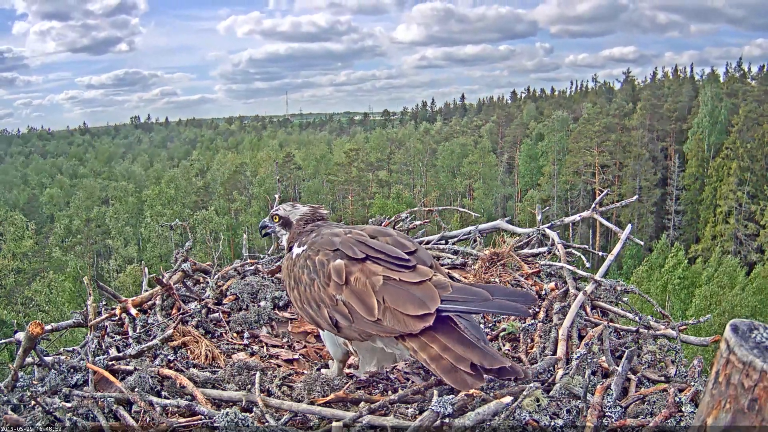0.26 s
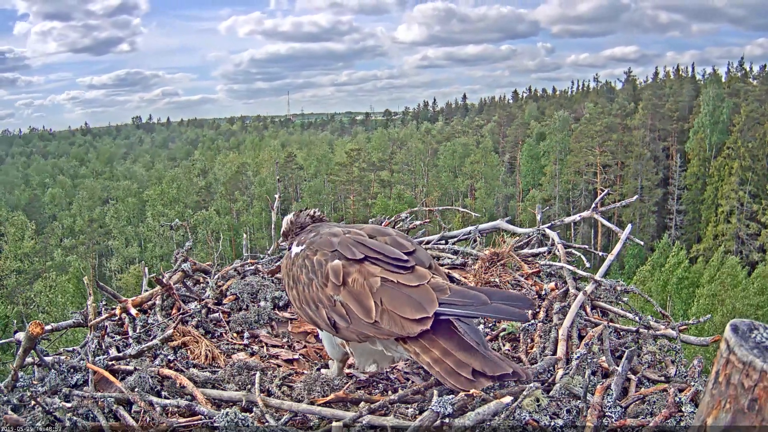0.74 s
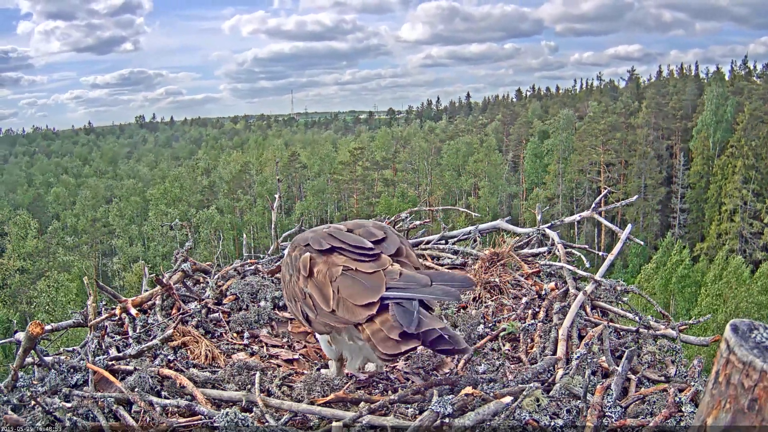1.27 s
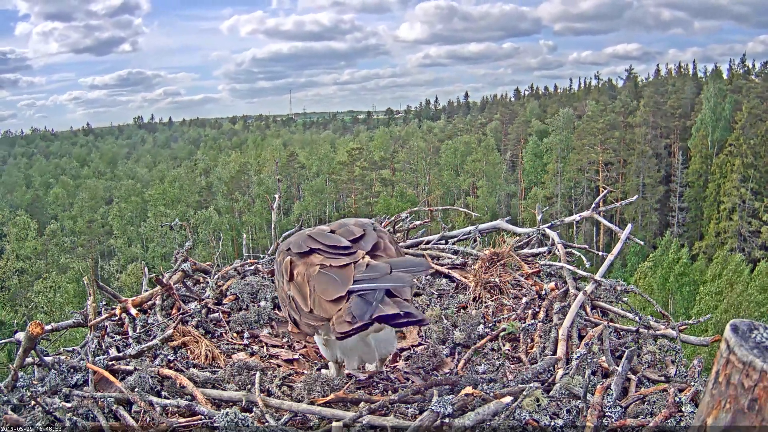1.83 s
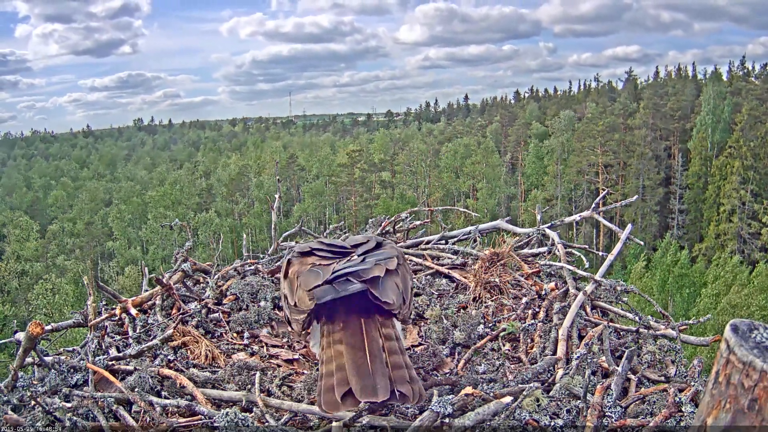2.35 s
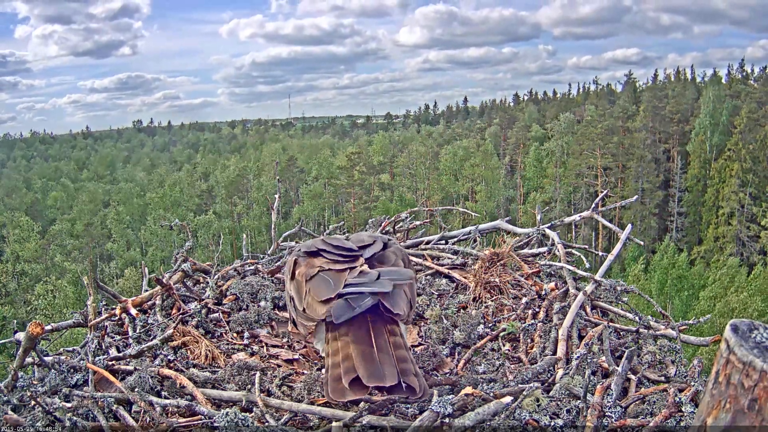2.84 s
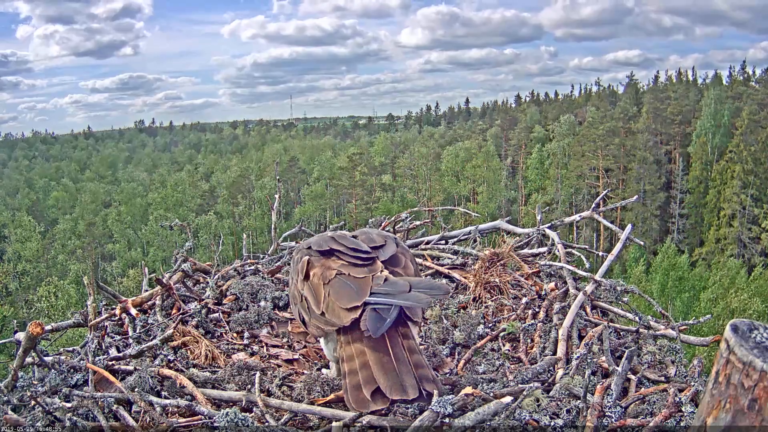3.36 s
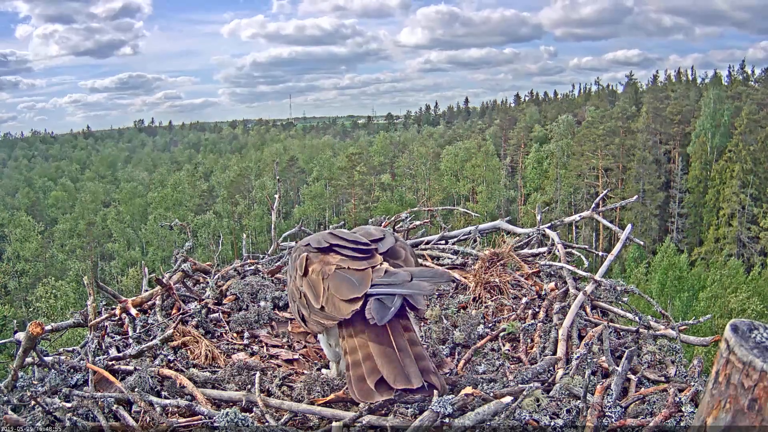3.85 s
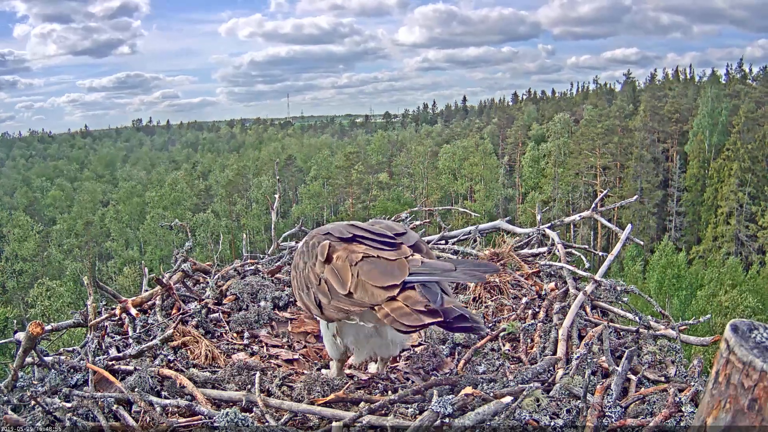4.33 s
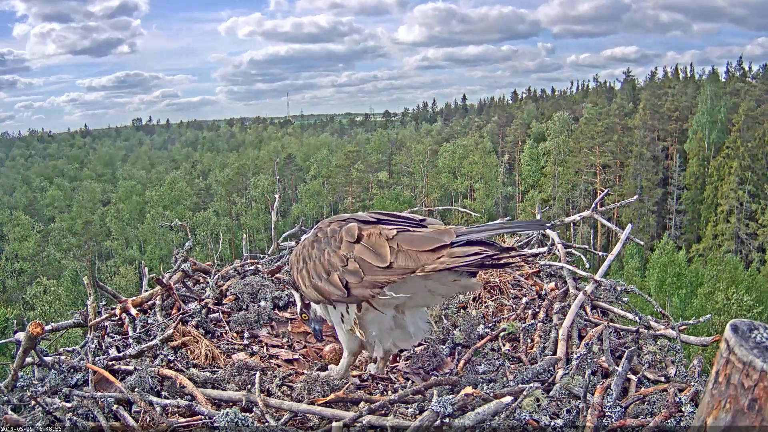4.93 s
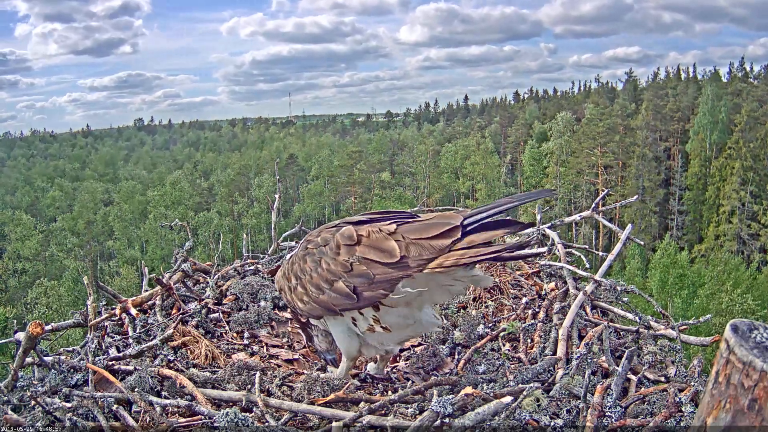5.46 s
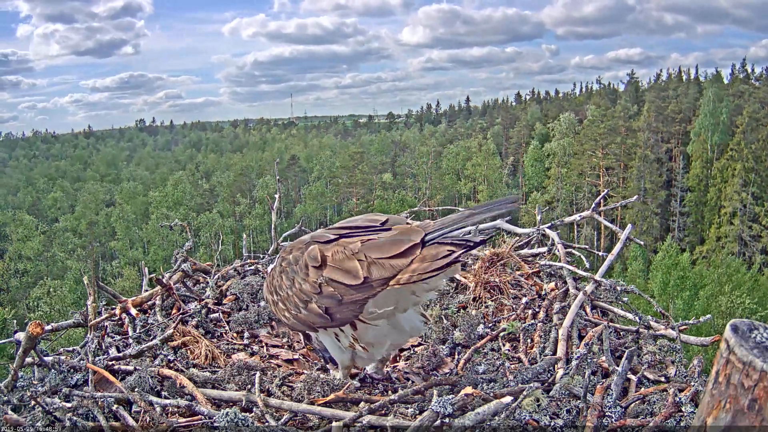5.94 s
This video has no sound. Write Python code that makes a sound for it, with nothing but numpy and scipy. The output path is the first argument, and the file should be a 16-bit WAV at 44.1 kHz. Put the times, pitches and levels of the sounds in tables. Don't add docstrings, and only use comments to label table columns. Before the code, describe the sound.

Outdoors at a large raptor nest above a forest, wind buffets a boxed microphone with deep soft thumps over rustling and faint hiss. Dry twigs tap now and then. A nearby chick gives four very brief falling whistles, the third loudest and the last hoarse. Far songbirds whistle thinly, and a fly drones past faintly twice.

```python
import sys
import numpy as np
from scipy import signal
from scipy.io import wavfile
from scipy.ndimage import uniform_filter1d

SR = 44100
rng = np.random.default_rng(int(sys.argv[2]) if len(sys.argv) > 2 else 0)


def waveform_to_disk(signal):
    frames = np.transpose(np.atleast_2d(signal))
    scaled = np.clip(frames, -1, 1) * 32767
    samples = np.round(scaled).astype(np.int16)
    wavfile.write(sys.argv[1], SR, samples)


def magnitude_from_level(level_db):
    exponent = np.asarray(level_db, float) / 20
    return 10 ** exponent


N = 272979

HOUSING_HZ, HOUSING_WIDTH_HZ = 5860, 300
THROAT_HZ, THROAT_WIDTH_HZ = 3820, 150
OCTAVE_DB, THIRD_DB = -29.5, -29
LOUD_DB = -22.5
SLIDE_HZ_PER_S, EFFORT_HZ_PER_S = 3530, 2100


def evened(x):
    return x / np.sqrt(np.mean(x ** 2) + 1e-20)


def wander(count, size):
    return evened(uniform_filter1d(uniform_filter1d(rng.standard_normal(count), size), size))


def add(mix, s, sound):
    part = mix[round(s * SR):][:len(sound)]
    part += sound[:len(part)]


def sequence(events, voice):
    layer = np.zeros(N)
    for s, *shape in events:
        add(layer, s, voice(*shape))
    return layer


def resonance(hz, centre_hz, width_hz):
    return 1 / (1 + ((hz - centre_hz) / width_hz) ** 2) ** 2


def chirp(length, first_hz, db, hoarse):
    last_hz = first_hz - length * (SLIDE_HZ_PER_S + EFFORT_HZ_PER_S * magnitude_from_level(db - LOUD_DB) ** 2)
    rise = 0.0025 + 0.09 * hoarse ** 2
    gap_hz = 435 - 300 * hoarse
    flutter_hz = 300 - 430 * hoarse
    depth = 0.03 + 1.0 * hoarse
    t = np.arange(0, length, 1 / SR)
    u = t / length
    drift, shake = wander(4000, size=60)[:len(t)], wander(4000, size=50)[:len(t)]

    hz = first_hz + (last_hz - first_hz) * u ** 1.27 + 70 * np.exp(-t / 0.0031)
    throb = 2 * np.pi * np.cumsum(flutter_hz * (1 + 0.06 * drift)) / SR - 0.9
    throb = np.sin(throb) + 0.45 * np.sin(2 * throb)
    shaken_hz = hz * (1 + 0.02 * depth * drift + 0.3 * depth * hoarse * throb)
    turn = 2 * np.pi * np.cumsum(shaken_hz) / SR
    beat_hz = gap_hz * (1 + 5 * hoarse * (u - 0.3) + 0.2 * depth * shake)
    beat = 2 * np.pi * np.cumsum(beat_hz) / SR

    effort = np.clip(t / rise, 0, 1) ** 1.5 * np.clip((length - t) / 0.003, 0, 1)
    effort = effort * magnitude_from_level(-5 * (1 - u) ** 4 - 10 * u ** 6)
    flutter = 1 + depth * (throb + 0.15 * shake)
    whistle = effort * flutter * np.sin(turn)

    octave = magnitude_from_level(OCTAVE_DB - 0.6 * (db - LOUD_DB) - 100 * hoarse) * effort
    octave = octave * resonance(2 * hz, THROAT_HZ, THROAT_WIDTH_HZ) * (1 + 0.3 * shake) * np.sin(2 * turn)
    third = magnitude_from_level(THIRD_DB + 0.5 * (db - LOUD_DB)) * effort
    third = third * resonance(3 * hz, HOUSING_HZ, HOUSING_WIDTH_HZ) * np.sin(3 * turn)
    second = hoarse * magnitude_from_level(-3.2 * u) * effort * (1 + 0.25 * drift) * np.sin(turn + beat)
    ring = magnitude_from_level(2 * db + 14 - 130 * (u - 0.8) ** 2) * effort * np.sin(2 * np.pi * 1.012 * HOUSING_HZ * t)
    return np.sqrt(2) * magnitude_from_level(db) * (whistle + octave + third + second + ring)


# start in seconds, length in seconds, first pitch in Hz, level in dB,
# hoarseness from 0 to 1.
CHIRPS = [
    (1.707, .053, 1950, -29.5, .02),
    (3.898, .031, 1974, -36, 0.11),
    (5.459, 0.051, 2025, -22.5, 0.04),
    (6.157, 0.064, 2160, -29, .355),
]


def chick():
    return sequence(CHIRPS, chirp)


def knock(hz, db, t60, scrape):
    t = np.arange(0, 0.15, 1 / SR)
    blur = 1 - scrape + scrape * wander(7000, size=30)[:len(t)]
    return magnitude_from_level(db - 60 * t / t60) * np.clip(t / 0.004, 0, 1) * blur * np.sin(2 * np.pi * hz * t)


# start in seconds, pitch in Hz, level in dB,
# 60 dB decay time in seconds, scrape share from 0 to 1.
TWIGS = [
    (.057, 1200, -36.5, .12, 0),
    (1.553, 660, -35, .13, .3),
    (2.165, 700, -41, .08, .5),
    (2.744, 980, -41, .08, .6),
    (4.36, 1040, -45, .06, .6),
    (6.116, 1450, -42, .05, 0.3),
    (6.134, 1390, -36, .04, .2),
    (6.14, 950, -38, .07, .35),
]


def twigs():
    return sequence(TWIGS, knock)


def drone(length, first_hz, last_hz, db):
    t = np.arange(0, length, 1 / SR)
    waver = wander(30000, size=1500)[:len(t)]
    wing_hz = np.linspace(first_hz, last_hz, len(t)) * (1 + 0.014 * waver)
    turn = 2 * np.pi * np.cumsum(wing_hz) / SR
    wings = np.sin(turn) + magnitude_from_level(-9.5) * np.sin(2 * turn)
    return np.sqrt(2) * magnitude_from_level(db) * wings * signal.windows.tukey(len(t), 0.3)


# start in seconds, length in seconds, first pitch in Hz,
# last pitch in Hz, level in dB.
FLY = [
    (1.601, 0.29, 203, 207.3, -56),
    (2.69, .43, 199.5, 194.6, -57),
]


def fly():
    return sequence(FLY, drone)


def note(rows, rasp):
    s, hz, db = np.transpose(rows)
    t = np.arange(s[0], s[-1], 1 / SR)
    smooth, grain = wander(20000, size=150)[:len(t)], wander(20000, size=45)[:len(t)]
    shimmer = evened(1 - rasp + 0.044 * smooth + rasp * grain)
    turn = 2 * np.pi * np.cumsum(np.interp(t, s, hz)) / SR
    edges = signal.windows.tukey(len(t), min(0.4, 0.017 / (s[-1] - s[0])))
    return np.sqrt(2) * magnitude_from_level(np.interp(t, s, db)) * shimmer * np.sin(turn) * edges


def forest(x, t60, wet_db):
    t = np.arange(SR // 2) / SR
    tail = rng.standard_normal(len(t)) * magnitude_from_level(-60 * t / t60) * np.clip(t / 0.039, 0, 1)
    return x + magnitude_from_level(wet_db) * signal.oaconvolve(x, tail / np.linalg.norm(tail))[:N]


# time in seconds, pitch in Hz, level in dB.
WARBLE = [(.775, 2450, -64), (.81, 2770, -56), (.88, 2900, -56), (.915, 3330, -57), (.985, 3500, -57),
          (1.04, 3250, -56), (1.07, 2980, -58), (1.16, 2900, -61)]
RISER = [(1.689, 2720, -60), (1.755, 2990, -61), (1.8, 3600, -56)]
# start in seconds, length in seconds, first pitch
# in Hz, # last pitch in Hz, level in dB.
FLUTE = [(1.05, 0.092, 2670, 2530, -64), (1.215, .08, 1880, 2100, -56), (2.63, .02, 2910, 2870, -60),
         (3.927, .011, 1900, 1830, -50), (4.015, 0.039, 2240, 2760, -57), (4.083, .015, 2940, 2870, -58),
         (4.075, 0.038, 2630, 2230, -51.5), (4.11, 0.03, 2130, 1940, -49.5), (4.17, 0.063, 3740, 3530, -66),
         (6.15, .013, 2590, 2250, -52)]
PIPS = [(1.363, .014, 5250, 5420, -62), (1.373, .04, 5480, 5530, -62), (1.42, .04, 5500, 5480, -67),
        (1.37, .04, 4330, 4330, -64), (1.49, .028, 4000, 4500, -62), (1.513, .022, 4480, 4550, -66),
        (2.03, .09, 5460, 5100, -69), (3.84, 0.033, 5550, 5420, -64), (5.6, 0.025, 6240, 6400, -66)]


def songbirds():
    def glide(rasp):
        return lambda length, first_hz, last_hz, db: note([(0, first_hz, db), (length, last_hz, db)], rasp)

    song = sequence(FLUTE, glide(rasp=0.12)) + sequence(PIPS, glide(rasp=0.25))
    add(song, WARBLE[0][0], note(WARBLE, rasp=0.56))
    add(song, RISER[0][0], note(RISER, rasp=0.2))
    return forest(song, t60=0.3, wet_db=-7)


def air(colour, patchy_db, size):
    hz = np.fft.rfftfreq(size, 1 / SR)
    a, b, patches = rng.standard_normal((N * 4 // size + 5, len(hz), 3)).T
    patches = uniform_filter1d(uniform_filter1d(patches, size=10, axis=0), size=10, axis=1)
    f, db = np.transpose(colour)
    shape_db = np.interp(np.log(hz + 1), np.log(f + 1), db, left=-120)
    z = (a + 1j * b) * magnitude_from_level(shape_db[:, None] + patchy_db * evened(patches))
    return evened(signal.istft(z, nperseg=size, noverlap=size * 3 // 4)[1][:N])


# frequency in Hz, density in dB per Hz.
BUFFET_COLOUR = [(1.2, -31), (2.0, -2.5), (16, 4.5), (26, -3), (46, -10), (102, -29.5), (220, -41.5),
                 (290, -75), (480, -120)]
RUSTLE_COLOUR = [(53, -33.5), (90, -1.5), (167, -13), (200, -8.5), (232, -10), (455, -11.5), (633, -9.5),
                 (1010, -12), (1190, -15), (1610, -12.5), (2400, -25.5), (3120, -47), (5280, -120)]
HISS_COLOUR = [(1350, -7), (2300, -6), (2520, -3), (2920, -0.5), (4470, -8.5), (5760, -4), (6840, -13.5),
               (8430, -17), (9010, -16.5), (9640, -10.5), (9930, -7.5), (10900, -17.5), (13700, -25)]
# time in seconds, level in dB.
WIND = [(0, -38), (.5, -46.5), (1.3, -44.5), (2.2, -40), (3.3, -34.5), (4.5, -33.5), (5.5, -35),
        (6.19, -36.5)]
# time in seconds, peak level in dB.
GUSTS = [(.12, -32.5), (.44, -57), (1.44, -45), (1.65, -38.5), (2.0, -36), (2.19, -41.5), (2.5, -31.5),
         (2.63, -30.5), (2.98, -33), (3.25, -28), (3.63, -30.5), (3.89, -30.5), (4.02, -24.5),
         (4.17, -32.5), (4.47, -32.5), (4.74, -39), (4.95, -21.5), (5.27, -30), (5.38, -29), (5.57, -32),
         (5.83, -36), (5.96, -31.5), (6.07, -39)]
GUST_RISE_S, GUST_FALL_S = 0.032, 0.057
CALM_DB = -45
RUSTLE_DB, RUSTLE_FOLLOWS = -47.5, 0.14
HISS_DB, HISS_FOLLOWS, HISS_LAG_S = -57.5, -0.3, 1.5


def wind():
    t = np.arange(N) / SR
    wind_db = np.interp(t, *np.transpose(WIND))
    gusts = np.zeros(N)
    for s, db in GUSTS:
        width = np.where(t < s, GUST_RISE_S, GUST_FALL_S)
        gusts += magnitude_from_level(db) ** 2 * np.exp(-((t - s) / width) ** 2)

    lumps = air(BUFFET_COLOUR, patchy_db=-0.3, size=16384) * magnitude_from_level(0.71 * wander(N, size=1500))
    lumps = lumps / np.sqrt(uniform_filter1d(lumps ** 2, size=7000) + 0.018)
    strength = np.sqrt(magnitude_from_level(wind_db) ** 2 + gusts) * magnitude_from_level(2.0)
    buffeting = strength * np.clip(t / 0.0044, 0, 1) * lumps

    keep = np.exp(-1 / (HISS_LAG_S * SR))
    lagging_db = signal.lfilter([1 - keep], [1, -keep], wind_db - CALM_DB)
    rustle_db = RUSTLE_DB + RUSTLE_FOLLOWS * (wind_db - CALM_DB)
    rustle = magnitude_from_level(rustle_db) * air(RUSTLE_COLOUR, patchy_db=0.68, size=1024)
    hiss_db = HISS_DB + HISS_FOLLOWS * lagging_db
    hiss = magnitude_from_level(hiss_db) * air(HISS_COLOUR, patchy_db=1.0, size=1024)
    return buffeting + rustle + hiss


def scene():
    return (chick() + twigs() + fly() + songbirds() + wind())[None]


def stream(x, weak_db, from_hz, edge_hz):
    hz, t, z = signal.stft(x, SR, nperseg=2048, noverlap=1536)
    power = abs(z) ** 2
    smooth = uniform_filter1d(power, size=7, axis=1)
    held = uniform_filter1d(smooth, size=3, axis=0)
    around = uniform_filter1d(smooth, size=120, axis=0)
    calls = power[hz > 1500].sum(0)
    weak_db = weak_db + 10 * np.log10(np.clip(calls / np.median(calls), 1, 1e3)) * 0.12
    weak = (held < around * magnitude_from_level(weak_db) ** 2) & (hz[:, None] > from_hz)
    weak = uniform_filter1d(weak * 1.0, size=3, axis=0) > 0
    kept = z * ~weak * (hz[:, None] < edge_hz)
    return signal.istft(kept, SR, nperseg=2048, noverlap=1536)[1][:N]


def roll_off(x):
    return signal.sosfilt(signal.butter(12, 13840, fs=SR, output="sos"), x)


def record(dry):
    bias = 0.023 * np.clip(np.arange(N) / (0.03 * SR), 0, 1)
    sent = stream(dry[0], weak_db=-5.5, from_hz=7000, edge_hz=13900)
    return roll_off(sent[None] + bias)


dry = scene()
out = record(dry)
waveform_to_disk(out)
```